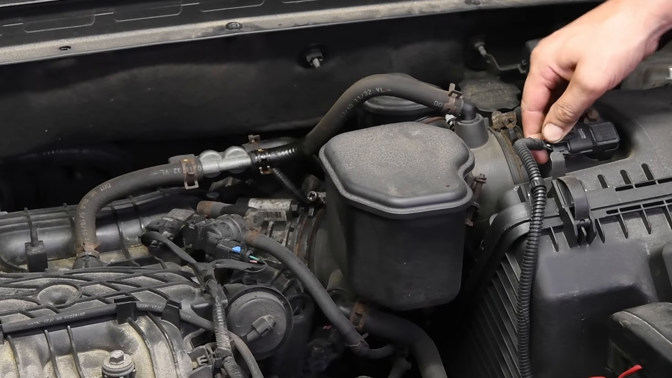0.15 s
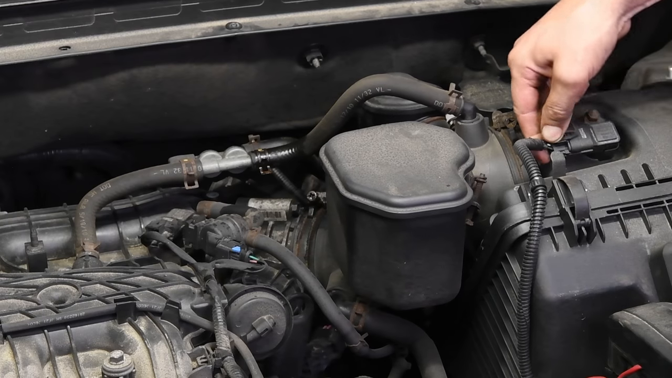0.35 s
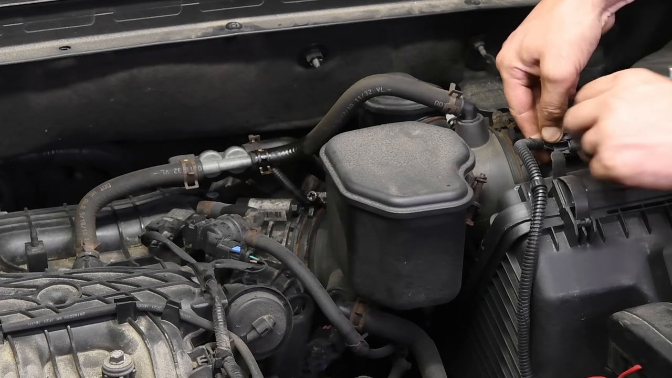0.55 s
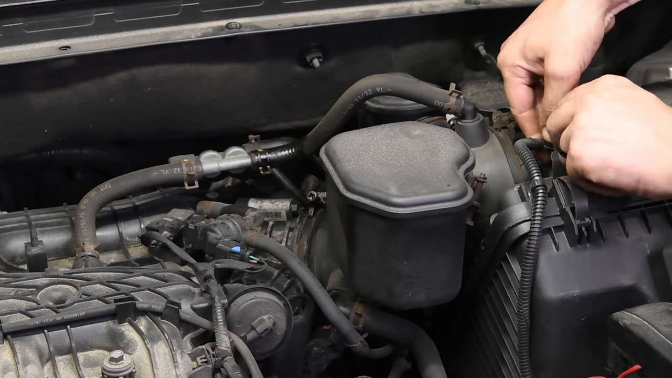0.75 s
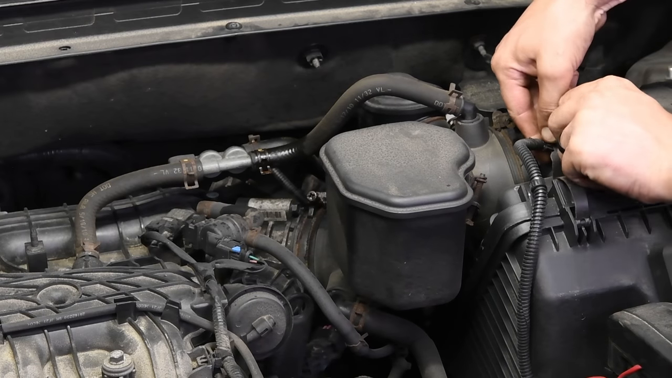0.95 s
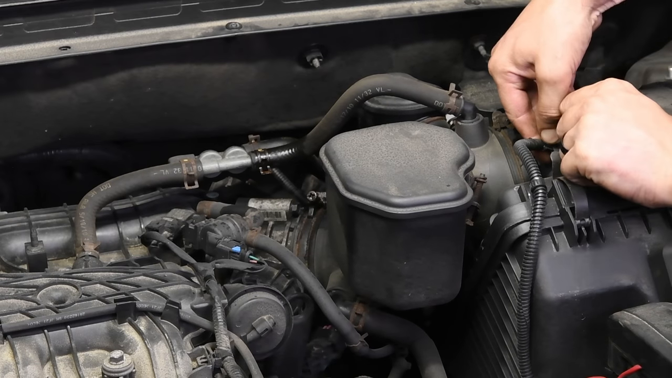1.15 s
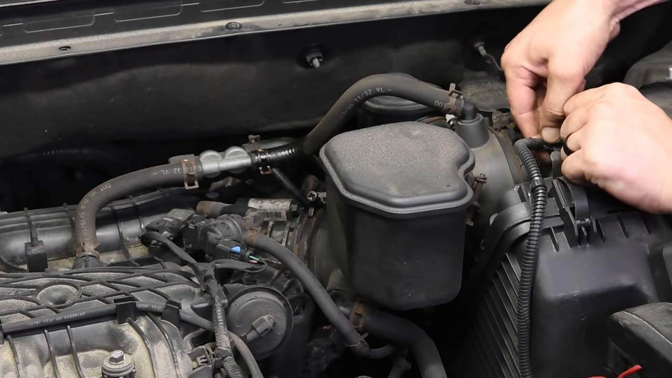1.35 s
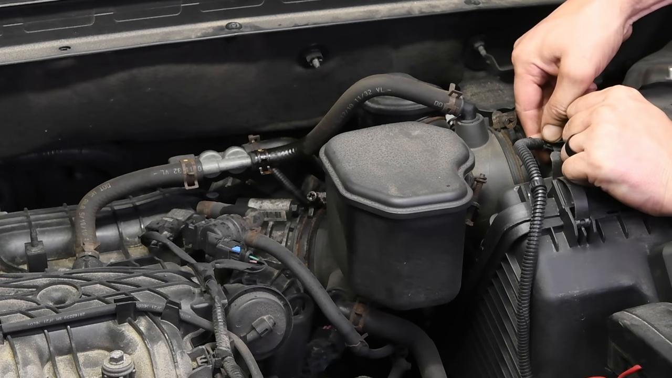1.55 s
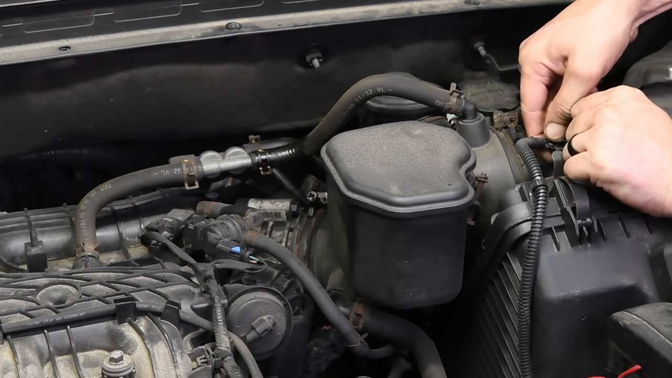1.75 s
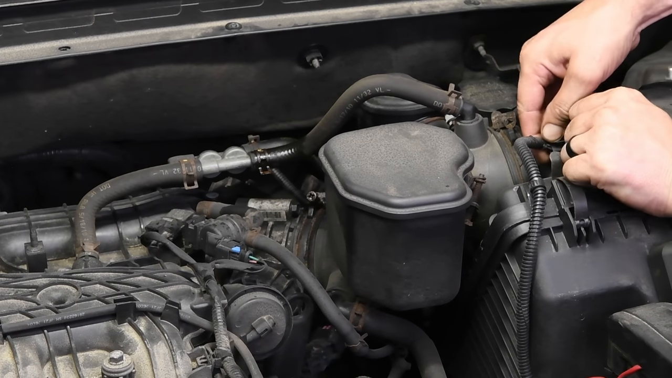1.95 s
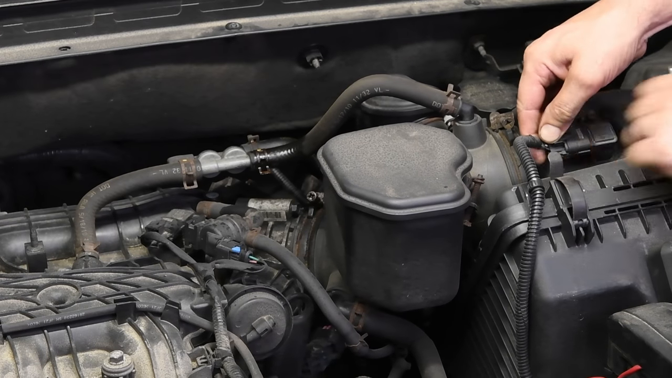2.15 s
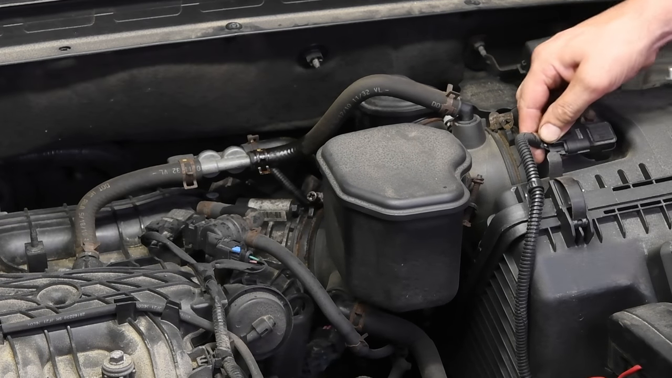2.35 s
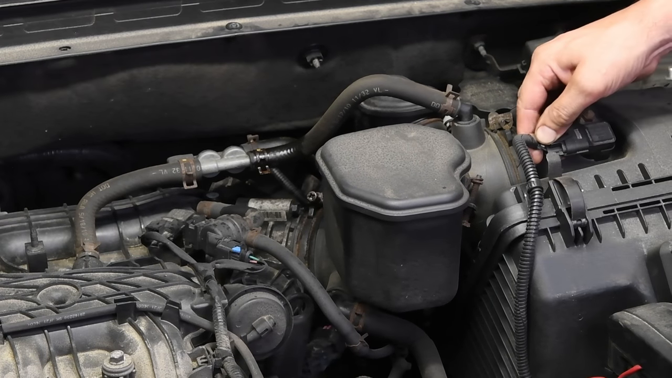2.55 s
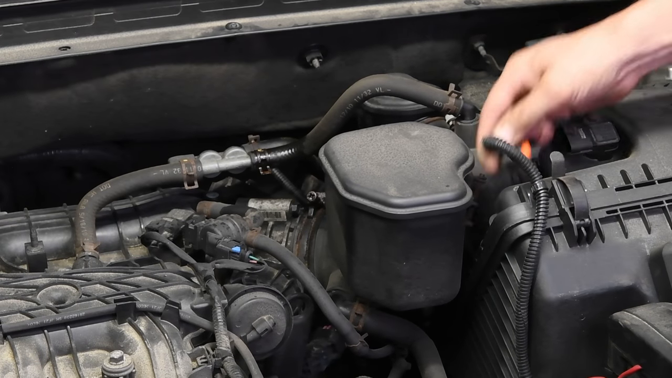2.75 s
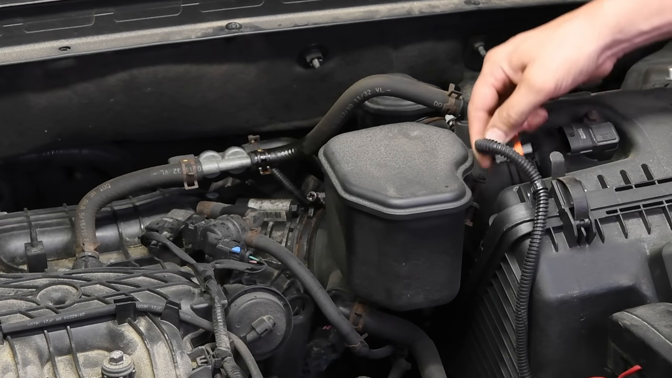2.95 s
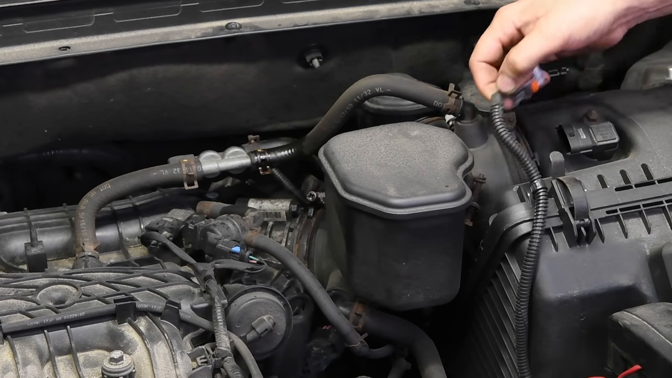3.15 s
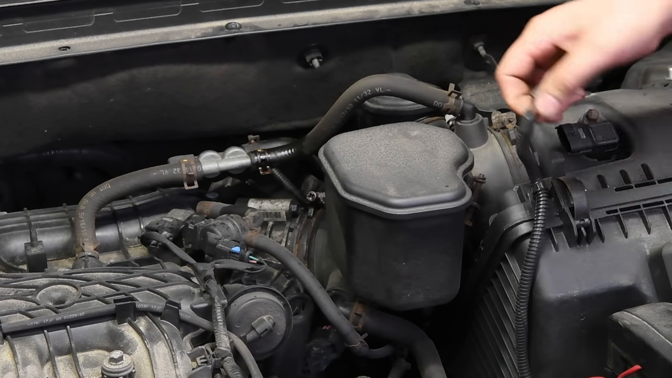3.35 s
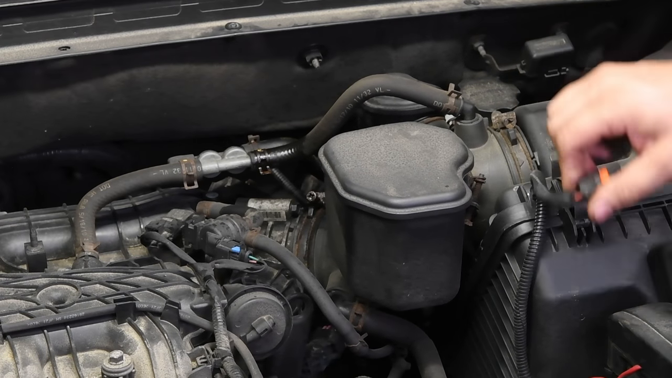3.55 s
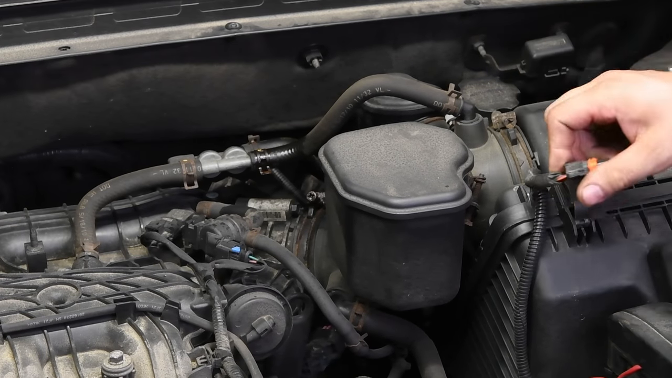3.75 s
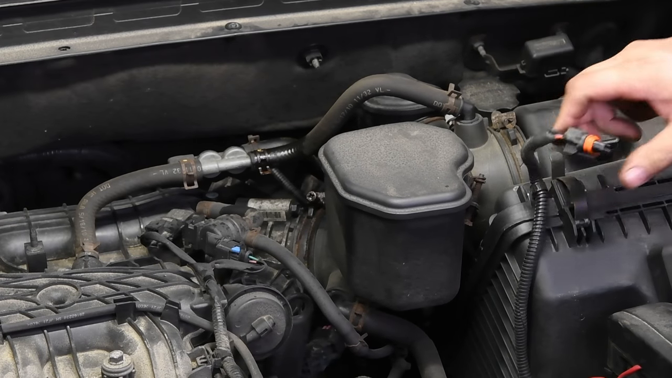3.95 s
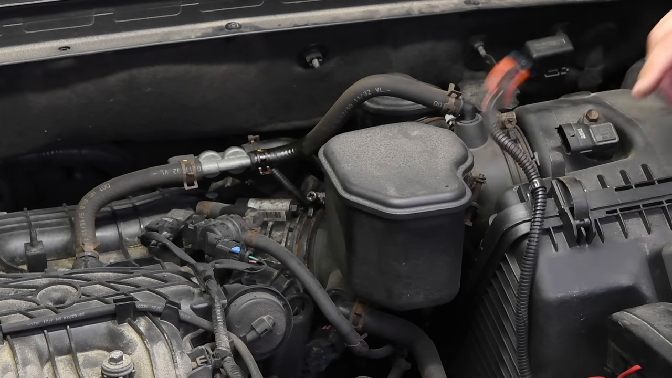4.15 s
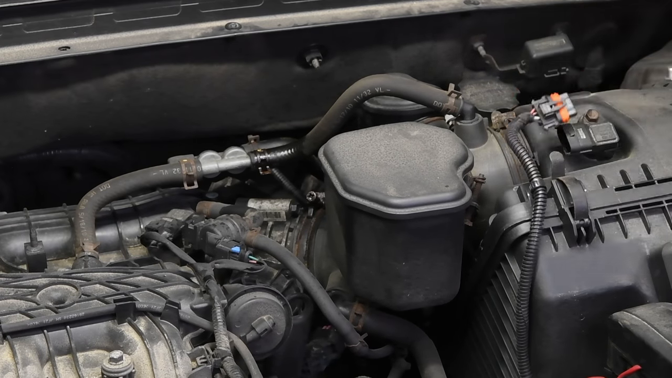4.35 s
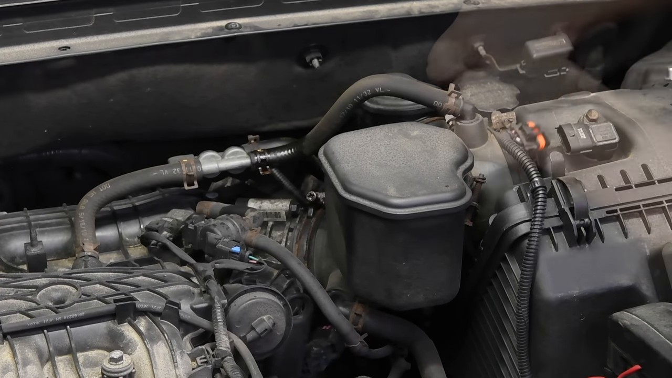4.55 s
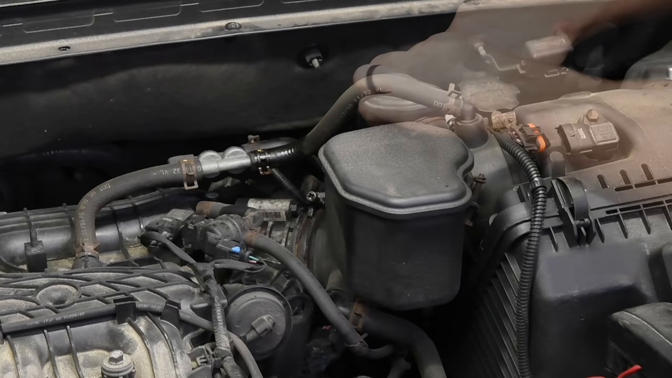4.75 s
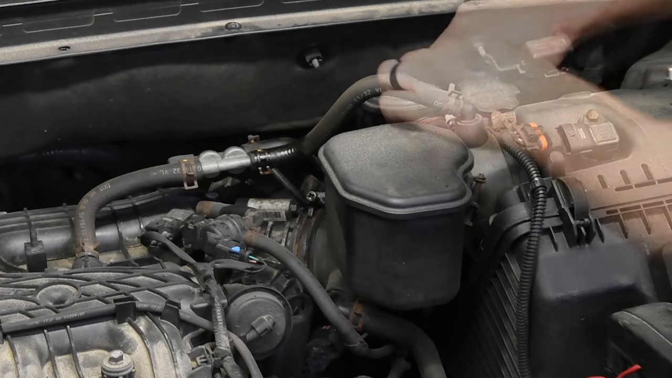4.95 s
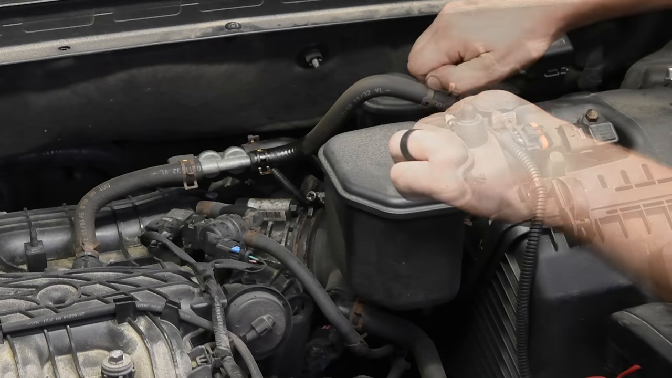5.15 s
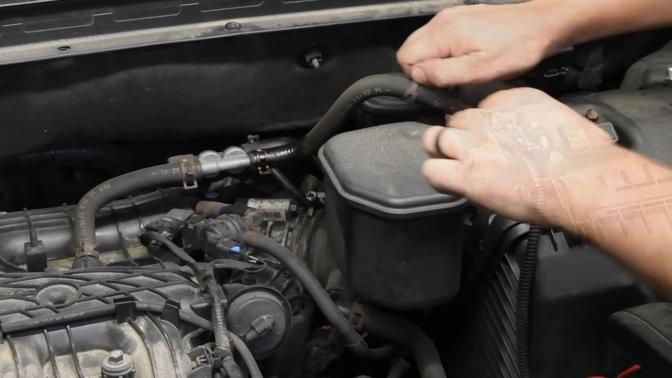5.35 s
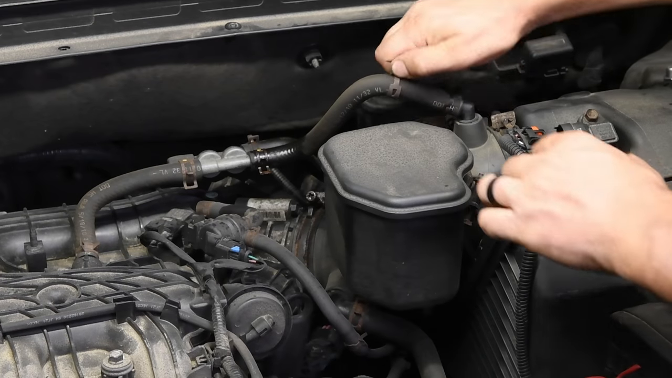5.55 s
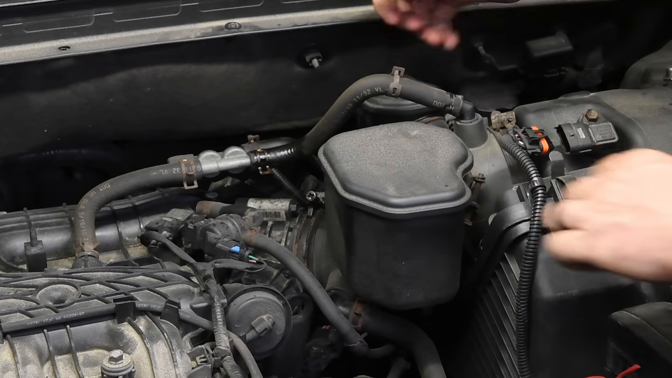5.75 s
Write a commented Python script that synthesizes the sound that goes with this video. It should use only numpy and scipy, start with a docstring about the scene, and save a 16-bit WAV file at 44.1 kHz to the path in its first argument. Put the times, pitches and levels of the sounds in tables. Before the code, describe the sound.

Close, nearly dry handling sounds come from a hollow plastic air box: skin rubbing, light finger taps, then a snap. Knocks and sharp little clicks follow as an electrical plug strikes hard parts, before a rubber hose is twisted with a quiet scrape and a few soft bumps. Behind it all are a faint workshop hum, hiss and a far-off cricket chirping now and then.

```python
"""Hands on the plastic air box of a stopped engine, close to the microphone in a quiet workshop.
They unlatch a plug, lay its lead aside and ease off a rubber hose: fingers rub and bump, the plug
clicks against metal, knocks ring the walls and air of the hollow box, and the turning hose scrapes.
Far off a cricket chirps with its wings, much of it heard through the room, over faint hum and hiss."""
import sys
import numpy as np
from scipy import signal
from scipy.fft import rfft, irfft, next_fast_len
from scipy.io import wavfile

SR = 44100
rng = np.random.default_rng(int(sys.argv[2]) if len(sys.argv) > 2 else 0)


def wav_out(sig):
    """Save sig, one row per channel (or a flat mono array), as 16-bit PCM at SR to the path in sys.argv[1]."""
    wavfile.write(sys.argv[1], SR, np.round(np.clip(np.atleast_2d(sig).T, -1, 1) * 32767).astype(np.int16))


N = 259749
TIME = np.arange(N) / SR
AGE = np.arange(SR // 2) / SR  # seconds since a blow

# Room tone, and the gain of its stereo side signal. Each row: frequency in Hz, gain in dB.
ROOM_TONE_SPECTRUM = [(12, -65), (20, -16.5), (104, -1), (187, -4), (347, -3), (446, -6), (624, -6.5),
                      (759, -6), (897, -7.5), (1290, -8.5), (1570, -10), (2670, -10.5), (4540, -11),
                      (14700, -13.5), (16000, -20.5)]
ROOM_TONE_SIDE = [(25, 10), (60, -11), (125, -4), (300, -4), (1000, -2.5), (4000, -1), (8000, -0.5),
                  (14000, 0)]
# The workshop's reverberation. Each row: frequency in Hz, time to fall 60 dB in seconds.
ROOM_DECAY = [(100, 0.95), (500, 0.63), (2000, 0.53), (5000, 0.45), (9000, 0.38), (16000, 0.33)]
# A hand holds a part and rubs on the box. Each row: start and end in seconds, level in dB.
HAND_GRIPS = [(0, 0.993, -72.5), (1.46, 2.595, -72.5), (2.7, 3.012, -65.5), (4.683, 5.608, -68.5)]
# Skin slides over the ribbed sleeve.
# Each row: middle and half length in seconds, level in dB, tilt in dB per octave.
SLEEVE_SLIDES = [(0.227, 0.053, -61, -1.5), (0.45, 0.093, -67.5, -3), (.9, 0.025, -65, -22),
                 (1.994, 0.016, -58.5, 1.5), (2.708, 0.05, -55, -3.5), (4.07, 0.071, -63.5, 4)]
# Soft finger bumps. Each row: start in seconds, level in dB, weight from 0 (a fingertip on the wall)
# to 1 (the flesh of the hand shaking the whole box), wall pitch in Hz.
FINGER_BUMPS = [(.021, -49, 0.53, 1320), (.213, -61.5, 0.61, 750), (.659, -60, 0.16, 860),
                (.794, -54.5, 0.37, 900), (0.87, -58.5, .45, 705), (1.436, -50.5, 0.64, 870),
                (1.892, -55, 0.75, 760), (1.985, -55, 0.61, 1070), (2.041, -56.5, 0.45, 1100),
                (2.098, -57.5, 0.75, 780), (2.201, -56, .52, 820), (2.228, -56.5, 0.29, 1090),
                (2.627, -51.5, 0.63, 900), (2.793, -46.5, 0.7, 900), (2.829, -51.5, 0.47, 750),
                (2.883, -54.5, 0.85, 750), (2.903, -54, .75, 1295), (2.969, -59.5, 0.23, 1340),
                (4.764, -52.5, 0.33, 1000), (4.777, -57.5, 0.79, 1060), (4.891, -53.5, 0.5, 1010),
                (5.047, -61, 0.27, 890), (5.499, -60, 0.25, 1010), (5.562, -53, 0.56, 1300),
                (5.628, -51, 0.47, 1170), (5.64, -53, 1, 800)]
# Modes of the box's walls and of the air inside.
# Each row: frequency in Hz, relative level in dB, time to fall 60 dB in seconds at a damping of 1.
WALL_MODES = [(761, -3, 0.084), (914, 2.5, 0.027), (930, -1, 0.028), (955, 0.5, 0.086), (1157, 10.5, 0.01),
              (1249, -7, 0.095), (1654, 2.5, 0.024), (1826, -9, 0.051), (1890, -7, 0.06),
              (2245, -4.5, 0.038), (2800, -15.5, 0.03)]
CAVITY_MODES = [(324, -11, 0.12), (380, 0, 0.11), (405, 3.5, 0.056), (439, -2, 0.19), (484, 16, 0.046),
                (500.7, -1.5, 0.074), (562, -4, 0.15), (609.5, -3, 0.27), (643, -8, 0.2), (684, 5.5, 0.082)]
# Spectra of rubbing skin, contact on plastic, the shaking box and the struck plug.
# Each row: frequency in Hz, gain in dB.
RUB_SPECTRUM = [(100, -20.5), (200, -10), (300, -14), (400, -2.5), (520, -13), (650, -6.5), (800, -10.5),
                (1050, -9.5), (1700, -20), (4000, -33.5), (12000, -36)]
PLASTIC_SPECTRUM = [(300, -10), (900, 0), (2500, 6.5), (4500, 4.5), (7200, 4.5), (9000, 2), (13000, 3),
                    (16000, -7.5)]
THUD_SPECTRUM = [(20, -66), (50, -34), (100, -27), (175, -3.5), (240, -4.5), (300, -2.5), (450, -3.5),
                 (1000, -55.5)]
PLUG_SPECTRUM = [(200, -24), (1000, -17.5), (2200, -13.5), (3100, -2.5), (5000, -1.5), (7400, -3),
                 (9000, -8), (12500, -16), (16000, -23.5)]
# Small parts radiate little bass. Each row: frequency in Hz, gain in dB on all sounds of the box.
BOX_RADIATION = [(15, -28), (40, -31), (80, -7.5), (140, -2)]
# The plug and its catch strike small hard parts. Each row: start in seconds, level in dB,
# pitch in Hz, strength of that pitch in dB, tilt in dB per octave, room send in dB.
PLUG_CLICKS = [(0.027, -49, 5400, -10, -1.5, -8), (1.174, -52, 7100, -10, 10, -20),
               (2.093, -61, 4800, 6, -2, -20), (2.7695, -31.5, 3050, 14, 2.5, -9.5),
               (2.7972, -33, 2940, 16, 3.5, -23), (3.1637, -25, 3670, 13.5, 3, -14),
               (3.1664, -35, 5100, 27, -6.5, -7.5), (3.5699, -31.5, 5740, 6.5, 4, -12),
               (4.105, -58.5, 9000, 6, 3, -15), (4.138, -25, 5050, 5.5, 3, -13.5),
               (4.4104, -34, 4460, 26, 3, -14.5), (4.765, -57, 3700, 23, -8, -15)]
# The workshop swallows the top of a click. Each row: frequency in Hz, gain in dB.
CLICK_ROOM_GAIN = [(2500, -3), (4000, -2.5), (5500, 0), (7500, -7.5), (12000, -4)]
# The distant cricket. Each row: start in seconds, relative level in dB.
CRICKET_CHIRPS = [(0.209, -72.5), (0.919, -69.5), (1.32, -68), (2.24, -68.5), (2.985, -67), (3.785, -66.5),
                  (4.504, -66), (5.154, -65.5)]
# Hard blows on the box. Each row: start in seconds, levels of wall, thud, cavity and crack in dB,
# crack tilt in dB per octave, wall and cavity pitch in Hz, first flight in seconds, rebound loss in dB.
BOX_KNOCKS = [(1.6864, -30, -70, -35.5, -23, -0.5, 980, 577, .0015, 12.5),
              (1.6936, -41.5, -55.5, -37, -43, -6, 1780, 400, .008, 29),
              (2.6547, -52, -49.5, -41.5, -38, -5, 1400, 495, 0.0096, -1.5),
              (2.6721, -29, -34, -31, -25, -7, 980, 478, 0.0092, 10),
              (2.697, -47, -43, -38, -51, -7, 980, 416, 0.00983, 20),
              (4.2013, -29, -39, -38, -37, 0, 1040, 385, 0.0067, 15),
              (4.2175, -33.5, -50, -45, -44, -6, 1350, 510, .0065, 2.5),
              (4.41, -31.5, -69, -34, -31.5, -2, 2200, 597, 0.018, 9)]
# Turns of the hose on its neck. Each row: middle in seconds, level in dB.
HOSE_TURNS = [(4.86, -76), (5.08, -62), (5.37, -67.5), (5.66, -81)]


def amp(db):
    """Decibels to gain."""
    return 10 ** (np.asarray(db) / 20)


def unit(x):
    """Scale to rms 1."""
    return x / np.sqrt(np.mean(x ** 2) + 1e-20)


def along(points, hz):
    """Interpolate (Hz, value) points on a log frequency axis."""
    freqs, values = np.transpose(points)
    return np.interp(np.log(hz + 1), np.log(freqs + 1), values)


def tilt(hz, db_per_octave):
    """A slope in dB that turns about 5 kHz and is flat below 1 kHz."""
    return db_per_octave * np.log2(np.maximum(hz, 1000) / 5000)


def hump(hz, centre_hz, octaves, db):
    """A resonant peak in dB."""
    return db / (1 + (np.log2((hz + 1) / centre_hz) / octaves) ** 2)


def colour(x, curve):
    """Minimum-phase filter with the gain curve(Hz) in dB."""
    size = 2 * next_fast_len(x.shape[-1] // 2 + 4096)
    gain = amp(curve(np.fft.rfftfreq(size, 1 / SR)))
    cepstrum = irfft(np.log(gain + 1e-6))
    cepstrum[1:size // 2] *= 2
    cepstrum[size // 2 + 1:] = 0
    return irfft(rfft(x, size) * np.exp(rfft(cepstrum)), size)[..., :x.shape[-1]]


def favour(x, centre_hz, octaves, db):
    """Lift one band: the place of contact decides which modes speak most."""
    return colour(x, lambda hz: hump(hz, centre_hz, octaves, db))


def wobble(rate, size):
    """A random curve with rate knots a second."""
    return np.interp(np.arange(size) * rate / SR, np.arange(4096), rng.standard_normal(4096))


def blow(x, db):
    """Give a blow the energy of 5 ms at this level."""
    return amp(db) * x * np.sqrt(.005 * SR / np.sum(x ** 2))


def fade(t60):
    """A decay of 60 dB in t60 seconds."""
    return np.exp(-np.log(1000) * AGE / max(t60, 1e-3))


def add(track, start, x):
    """Mix x into the track at start seconds."""
    part = track[max(round(start * SR), 0):][:len(x)]
    part += x[:len(part)]


def room_tone(mid_db=-66):
    """Low workshop hum and even microphone hiss."""
    noise = rng.standard_normal((2, N + SR))
    mid, side = colour(noise, lambda hz: along(ROOM_TONE_SPECTRUM, hz))[:, SR:]
    side = colour(unit(side), lambda hz: along(ROOM_TONE_SIDE, hz))
    return amp(mid_db) * np.array([unit(mid) + side, unit(mid) - side])


def friction():
    """Skin and rubber catch and slip in tiny grains."""
    return rng.standard_normal(N) * amp(2.8 * wobble(rate=160, size=N))


def plastic(x, slope_db):
    """Contact on plastic colours x; a lower slope makes it duller."""
    return colour(x, lambda hz: along(PLASTIC_SPECTRUM, hz) + tilt(hz, slope_db))


def hand_swell(middle, half_s):
    """A movement of the hand speeds up and slows down again."""
    return np.exp(-((TIME - middle) / half_s) ** 2)


def rubbing(fade_s=0.038):
    """Skin rubs the box as long as a hand holds on, and hisses as it slides over the sleeve."""
    rub = colour(friction(), lambda hz: along(RUB_SPECTRUM, hz))
    held = sum(amp(db) * np.clip(np.minimum(TIME - start, end - TIME) / fade_s + .5, 0, 1)
               for start, end, db in HAND_GRIPS)
    out = unit(rub) * held
    for middle, half_s, db, slope_db in SLEEVE_SLIDES:
        hiss = unit(plastic(friction(), slope_db))
        out += amp(db) * hiss * hand_swell(middle, half_s)
    return out


def impact(t60, spike):
    """A sharp first contact followed by a dense, quickly dying ring."""
    x = rng.standard_normal(len(AGE)) * fade(t60)
    x[0] = spike * np.linalg.norm(x)
    return x


def ring(modes, damping, scatter_db, waver):
    """Each blow rings the modes at new strengths; loosely seated parts waver in pitch."""
    out = np.zeros(len(AGE))
    for hz, db, t60 in modes:
        phase = 2 * np.pi * hz * np.cumsum(1 + waver * wobble(rate=158, size=len(AGE))) / SR
        strength = rng.choice([-1, 1]) * amp(db + scatter_db * rng.normal())
        out += strength * fade(t60 / damping) * np.sin(phase)
    return out


def thud(t60, mount_hz=165):
    """The whole box shakes on its rubber mounts."""
    shake = impact(t60, spike=1.0)
    return colour(shake, lambda hz: along(THUD_SPECTRUM, hz) + hump(hz, mount_hz, octaves=0.41, db=4.5))


def finger_bumps(rise_s=0.0012):
    """Fingers tap, press briefly and damp the box; the heavier the touch, the deeper it sounds."""
    out = np.zeros(N)
    rise = 1 - np.exp(-AGE / rise_s)  # soft skin takes a moment to press home
    for start, db, weight, wall_hz in FINGER_BUMPS:
        heavy = weight - .5
        shift_db = 16.75 * heavy  # weight moves the sound from wall to cavity
        wall_db, cavity_db, thud_db = db - shift_db, db + shift_db, db - 7 + 30 * heavy
        cavity_hz = 424 * 2 ** (-0.3 * heavy)
        press = impact(t60=.045, spike=.6)
        wall = signal.fftconvolve(press, ring(WALL_MODES, damping=2.5, scatter_db=2, waver=.03))
        wall = favour(wall[:len(AGE)] * rise, wall_hz, octaves=0.16, db=16)
        cavity = ring(CAVITY_MODES, damping=1.5, scatter_db=2, waver=0.037)
        cavity = favour(cavity * rise, cavity_hz, octaves=0.14, db=14)
        scuff = plastic(press * rise, slope_db=-4.5)
        add(out, start, blow(wall, wall_db) + blow(scuff, wall_db - 6))
        add(out, start, blow(cavity, cavity_db) + blow(thud(t60=0.16), thud_db))
    return out


def plug_clicks(room_peak_share=0.77):
    """The light plug clicks and each place it strikes rings briefly. Returns direct sound and room send."""
    direct, send = np.zeros((2, N))
    for start, db, pitch_hz, peak_db, slope_db, send_db in PLUG_CLICKS:
        body = lambda hz: along(PLUG_SPECTRUM, hz) + tilt(hz, slope_db)
        peak = lambda hz: hump(hz, pitch_hz, octaves=0.15, db=peak_db)
        click = colour(impact(t60=0.033, spike=0.8), lambda hz: body(hz) + peak(hz))
        # summed over all directions the radiated spectrum is smooth
        smooth = colour(signal.unit_impulse(len(AGE)), lambda hz: body(hz) + room_peak_share * peak(hz))
        add(direct, start, blow(click, db))
        add(send, start, blow(smooth, db + send_db))
    return direct, colour(send, lambda hz: along(CLICK_ROOM_GAIN, hz))


def workshop(x, side_db, build_s=0.0032):
    """The room's diffuse answer, nearly the same in both channels."""
    hz, t, spectra = signal.stft(rng.standard_normal((2, SR * 3 // 4)), SR, nperseg=256)
    decay = np.exp(-np.log(1000) * t / along(ROOM_DECAY, hz)[:, None])
    tail = signal.istft(spectra * decay, SR, nperseg=256)[1]
    tail *= 1 - np.exp(-np.arange(tail.shape[1]) / SR / build_s)
    mid, side = signal.fftconvolve(x[None], tail / np.linalg.norm(tail[0]), axes=1)[:, :N]
    return np.array([mid + amp(side_db) * side, mid - amp(side_db) * side])


def cricket(pitch_hz=4240, strokes_hz=44, rise_hz=130, chirp_s=.27):
    """Each wing stroke is a rasping tone that sags in pitch; a chirp starts low and swells unevenly."""
    out = np.zeros(N)
    t = np.arange(int(chirp_s * SR)) / SR
    for start, db in CRICKET_CHIRPS:
        stroke_phase = np.cumsum(strokes_hz * (1 + .3 * wobble(rate=30, size=len(t)))) / SR % 1
        rasp_hz = 85 * (1 - 2 * stroke_phase) + 60 * wobble(rate=250, size=len(t))
        hz = pitch_hz + rasp_hz - rise_hz * np.exp(-(t / 0.1) ** 2)
        tone = np.sin(2 * np.pi * np.cumsum(hz) / SR)
        strokes = amp(2.5 * wobble(rate=40, size=len(t))) * np.sqrt(np.sin(np.pi * stroke_phase))
        swell = np.sin(np.pi * t / chirp_s) ** 2
        add(out, start, amp(db) * unit(tone * strokes * swell))
    return out


def rebounds(start, flight_s, loss_db, count=3, shrink=.6):
    """Time and dB lost for a blow and its rebounds, each flight shorter than the last."""
    bounce = np.arange(count)
    return zip(start + flight_s * (1 - shrink ** bounce) / (1 - shrink), loss_db * bounce)


def box_knocks(cavity_loss_share=0.23, crack_loss_share=1.17):
    """Hard blows crack on the plastic, ring and shake the box. Returns direct sound and room send."""
    direct, send = np.zeros((2, N))
    for (start, wall_db, thud_db, cavity_db, crack_db, slope_db,
         wall_hz, cavity_hz, flight_s, loss_db) in BOX_KNOCKS:
        for at, lost_db in rebounds(start, flight_s, loss_db):
            wall = ring(WALL_MODES, damping=1.4, scatter_db=3, waver=0.033)
            wall = favour(wall, wall_hz, octaves=0.63, db=12.5)
            cavity = ring(CAVITY_MODES, damping=0.86, scatter_db=-1, waver=0.029)
            cavity = favour(cavity, cavity_hz, octaves=0.17, db=11.5)
            body = blow(wall, wall_db - lost_db) + blow(cavity, cavity_db - cavity_loss_share * lost_db)
            body += blow(thud(t60=0.13), thud_db - lost_db)
            crack = plastic(impact(t60=0.024, spike=0.37), slope_db)
            smooth = plastic(signal.unit_impulse(len(AGE)), slope_db)
            contact_db = crack_db - crack_loss_share * lost_db
            add(direct, at, body + blow(crack, contact_db))
            add(send, at, body + blow(smooth, contact_db))
    return direct, send


def hose(pitch_hz=385, scrape_db=-3):
    """With each turn the dragging rubber scrapes and hums in the low resonance of the box."""
    hum = favour(rng.standard_normal(N), pitch_hz, octaves=0.2, db=47)
    scrape = plastic(friction(), slope_db=-10)
    turns = sum(amp(db) * hand_swell(middle, half_s=0.069) for middle, db in HOSE_TURNS)
    return (unit(hum) + amp(scrape_db) * unit(scrape)) * turns


def scene():
    """The hands are close to the microphone and nearly dry; the cricket is far off in the room."""
    handling = finger_bumps() + rubbing() + hose()
    box, box_send = colour(np.array(box_knocks()) + handling, lambda hz: along(BOX_RADIATION, hz))
    plug, plug_send = plug_clicks()
    chirps = amp(-2.5) * cricket()
    room = amp(-16.5) * workshop(box_send, side_db=-55)
    room += workshop(plug_send, side_db=-43) + workshop(chirps, side_db=-51)
    return box + plug + chirps + room + room_tone()


def record(dry, top_hz=16200):
    """The microphone chain passes nothing above its band limit."""
    size = next_fast_len(N + SR // 2)
    passband = np.fft.rfftfreq(size, 1 / SR) < top_hz
    return irfft(rfft(dry, size) * passband, size)[:, :N]


dry = scene()
out = record(dry)
wav_out(out)
```